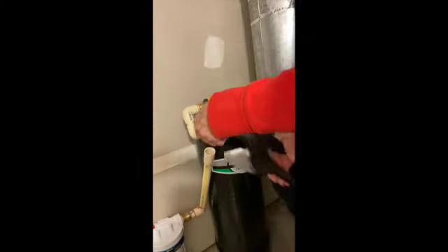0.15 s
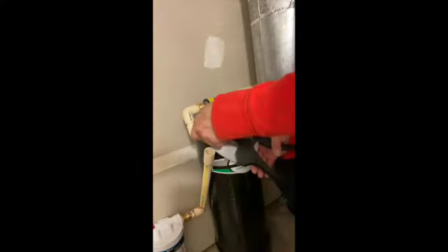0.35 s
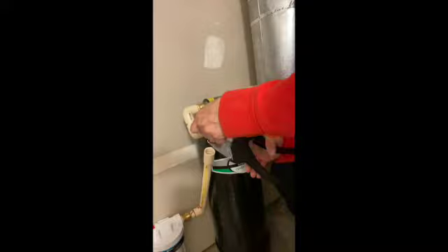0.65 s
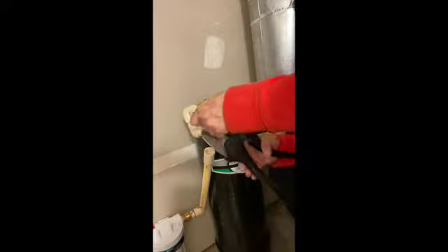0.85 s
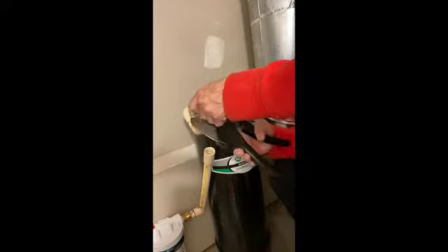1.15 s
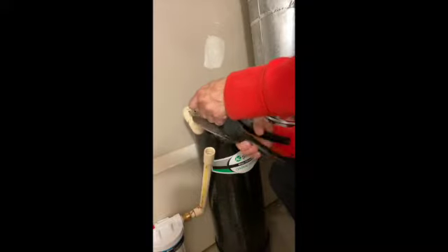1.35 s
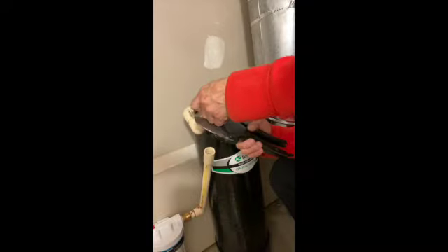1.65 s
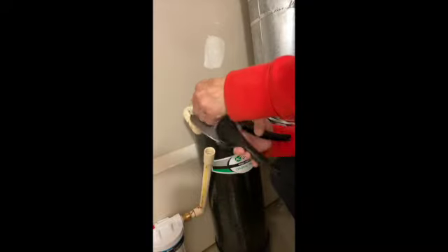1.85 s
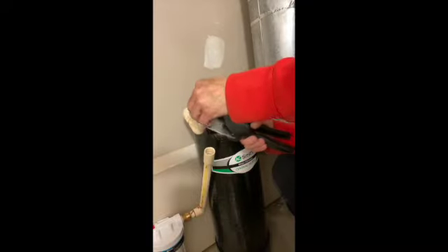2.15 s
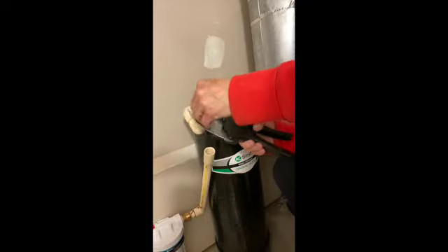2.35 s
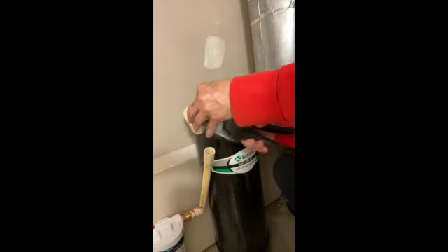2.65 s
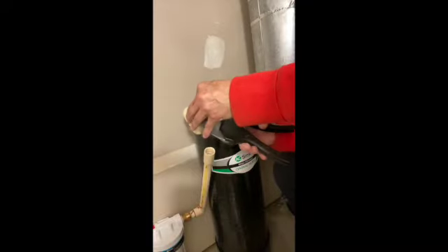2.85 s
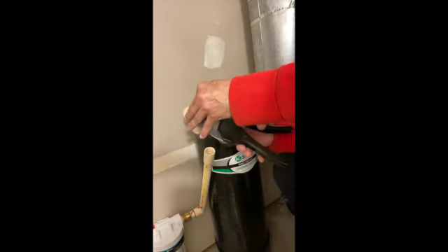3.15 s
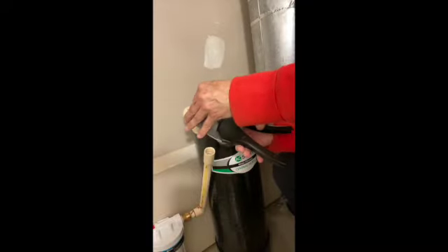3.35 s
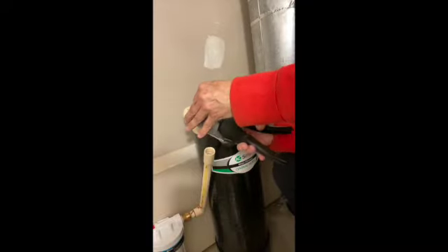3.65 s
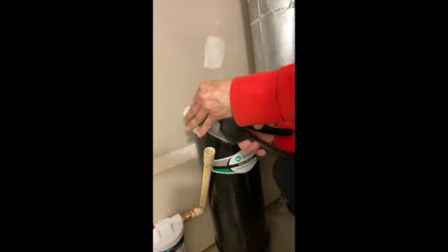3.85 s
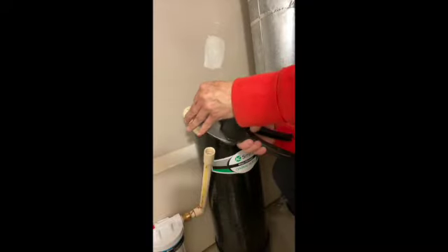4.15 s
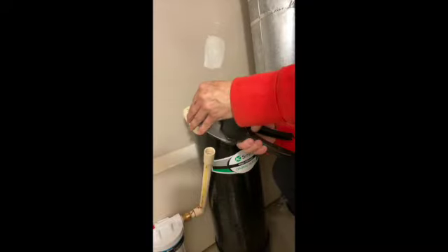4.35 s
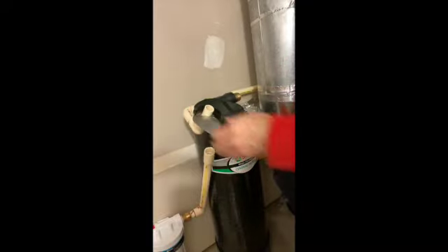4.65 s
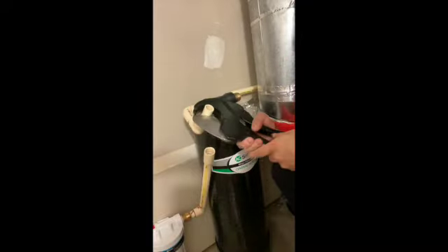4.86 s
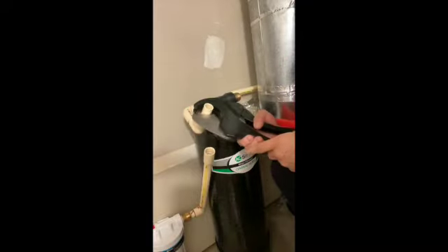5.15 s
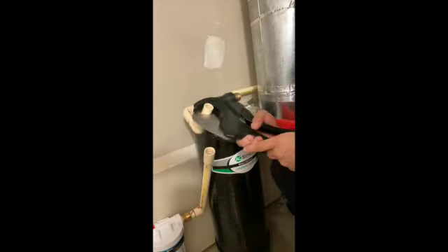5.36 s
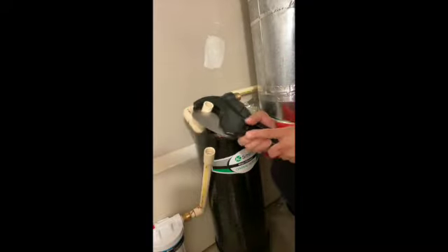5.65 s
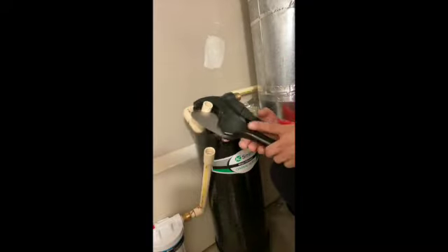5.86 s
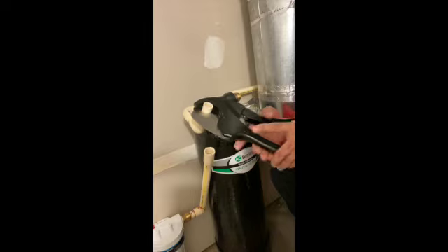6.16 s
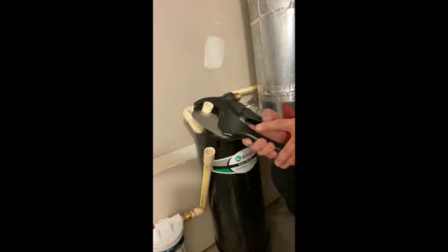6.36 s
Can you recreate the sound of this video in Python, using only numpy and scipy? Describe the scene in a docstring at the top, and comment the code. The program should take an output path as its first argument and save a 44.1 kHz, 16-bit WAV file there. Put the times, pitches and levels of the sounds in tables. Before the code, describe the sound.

Six hard ratchet clacks, four early and two late, among small plastic ticks, a short creak and sleeve rustle over quiet hum.

```python
"""Ratcheting cutter on a water pipe

A ratcheting cutter is squeezed through a plastic water pipe in a small utility corner.
Noise bursts shaped by jaw and pipe make the pawl snap and the handles tick; dying tones ring the steel.
Rows of slips creak the blade in the plastic; low tones boom and shudder the pipe; narrow noise scrapes.
Coloured noise in small catches is a sleeve, over a low mains hum of wavering tones and faint rumble."""
import sys
import numpy as np
from scipy import signal
from scipy.fft import rfft, irfft, next_fast_len
from scipy.io import wavfile
from scipy.ndimage import map_coordinates

SR = 44100
rng = np.random.default_rng(int(sys.argv[2]) if len(sys.argv) > 2 else 0)


def store_wav(level_fs):
    """Save 16-bit WAV to argv[1]."""
    pcm = np.round(np.clip(np.atleast_2d(level_fs), -1, 1) * 32767)
    wavfile.write(sys.argv[1], SR, pcm.T.astype(np.int16))


N = 286650  # length [samples]

# the knock, clack and crack of a contact, one row each: (from [Hz], to [Hz])
BANDS = [(150, 1200), (1200, 5500), (6000, 16000)]
# the pawl snaps: (time [s], clack [dB], crack [dB], hollowness [dB], bite pitch [Hz], bite [dB],
# thud before a shared 5.5 dB cut [dB], ring before each tone's own level [dB], favoured ring pitch [Hz])
SNAPS = [(1.5134, -26, -23, 4.5, 1704, -20.5, -51, -69, 1674),
         (1.7876, -16.5, -13.5, 1.5, 1568, -9.5, -41, -68, 1692),
         (2.1852, -25, -20, 6.5, 1673, -14.5, -40.5, -52, 2967),
         (2.707, -14.5, -14, -4, 2470, -22, -42, -54.5, 4300),
         (5.5376, -20, -17, -4.5, 3236, -25.5, -37, -63.5, 2210),
         (5.9507, -17, -14, -4.5, 2640, -27, -26, -71, 5146)]
# damped resonances of the pipe: (pitch [Hz], width [Hz], peak [dB])
PIPE_RESONANCES = [(299.8, 4.7, 18), (592.7, 90, 5), (870, 42, 8.8), (1590, 410, 6.5), (2300, 380, 5.8)]


def amp(db):
    """Turn decibels into a gain."""
    return 10 ** (np.asarray(db) / 20)


def unit(x):
    """Scale a sound to an rms of 1."""
    return x / np.sqrt(np.mean(x ** 2) + 1e-20)


def along(points, hz):
    """Read a curve of (Hz, value) points, joined by straight lines on a log frequency axis."""
    f, value = np.transpose(points)
    return np.interp(np.log(hz + 1), np.log(f + 1), value)


def wobble(rate):
    """Draw a smooth random curve through `rate` random points a second."""
    points = rng.standard_normal(int(N * rate / SR) + 4)
    return map_coordinates(points, [np.arange(N) * rate / SR])


def swell(middle, half):
    """Rise and fall smoothly about a moment, down to about a third of the peak at `half` seconds away."""
    t = np.arange(N) / SR
    return np.exp(-((t - middle) / half) ** 2)


def filtered(x, response):
    """Multiply the spectrum of a sound by a function of frequency."""
    size = next_fast_len(N + SR // 2)
    spectrum = rfft(x, size) * response(np.fft.rfftfreq(size, 1 / SR))
    return irfft(spectrum, size)[..., :N]


def pair(count, apart_db):
    """Noise at two close microphone ports: mostly shared, a little apart."""
    mid, side = rng.standard_normal((2, count))
    return mid + amp(apart_db) * np.array([side, -side])


def hiss(colour, apart_db):
    """Make steady coloured noise with an rms of 1."""
    return unit(filtered(pair(N, apart_db), lambda hz: amp(along(colour, hz))))


def add(track, s, sound):
    """Mix a sound into a track at time s."""
    part = track[:, max(round(s * SR), 0):][:, :sound.shape[-1]]
    part += sound[..., :part.shape[1]]


def body(colour, resonances, size=4096):
    """How an object answers a sharp tap: a smooth colour with resonant peaks, starting at once."""
    hz = np.fft.rfftfreq(size, 1 / SR)
    db = along(colour, hz)
    for pitch, width, peak_db in resonances:
        db = db + peak_db / (1 + (2 * (hz - pitch) / width) ** 2)
    # folding the cepstrum (the spectrum of the log spectrum) lets nothing sound before the tap
    cepstrum = irfft(np.log(amp(db)))
    cepstrum[1:size // 2] *= 2
    cepstrum[size // 2 + 1:] = 0
    return irfft(np.exp(rfft(cepstrum)))[None]


def burst(chatter_t60, walls_db, walls_t60, late_db, late_t60, grain_db):
    """A contact chatters in uneven grains; near walls answer, then the rest of the room."""
    t = np.arange(SR // 2) / SR
    # 900 random points a second make the grains
    unevenness = map_coordinates(rng.standard_normal(500), [t * 900], mode="wrap")
    grains = unit(amp(grain_db * unevenness))
    direct = amp(-60 * t / chatter_t60) * pair(len(t), apart_db=-17.5)
    walls = amp(walls_db - 60 * t / walls_t60)
    late = amp(late_db - 60 * t / late_t60)
    build_up = 1 - np.exp(-t / .002)
    return grains * direct + (walls + late) * build_up * pair(len(t), apart_db=-5)


def blow(push, response, levels_db):
    """A push through a body, its knock, clack and crack each at their own strength."""
    x = signal.fftconvolve(push, response, axes=1)
    onset = round(.014 * SR)  # each band's strength is set over its first 14 ms
    total = 0
    for band, db in zip(BANDS, levels_db):
        part = signal.sosfilt(signal.butter(3, band, "bandpass", fs=SR, output="sos"), x)
        total = total + amp(db) * part / np.std(part[:, :onset])
    return total


def mode(t, hz, t60, unrest):
    """A dying tone whose phase wanders a little, as hand-held parts do."""
    wander = unrest * np.cumsum(rng.standard_normal(len(t)))
    return amp(-60 * t / t60) * np.sin(2 * np.pi * hz * t + wander)


def room(air_db=-73, waver_db=1):
    """A slightly wavering mains hum over faint rumble."""
    # tones of the hum: (pitch [Hz], rms level [dB])
    hum_tones = [(120.3, -69), (82.6, -76), (240, -108), (324, -97)]
    # colour of the rumble: (frequency [Hz], level [dB])
    air_colour = [(25, -14.5), (48, -3.5), (90, -7.5), (130, -10.5), (190, -22), (350, -25.5), (600, -36),
                  (2000, -39.5), (4700, -43), (8000, -42), (13600, -49), (16000, -65)]
    t = np.arange(N) / SR
    hum = 0
    for hz, db in hum_tones:
        level = amp(db + waver_db * wobble(0.66)) * np.sqrt(2)
        hum = hum + level * np.sin(2 * np.pi * hz * t + 0.25 * wobble(1.0))
    return hum + amp(air_db) * hiss(air_colour, apart_db=-9.5)


def sleeve(body_db=-1, fizz_db=-1, grain_db=2):
    """Cloth and skin rub in small uneven catches, with each arm move and each squeeze of the handles."""
    # the arm moves and the sleeve rubs: (middle [s], half length [s],
    # level before the shared body and fizz levels [dB], fizz over body before those too [dB])
    strokes = [(0.02, 0.091, -79, -3.5), (0.98, 0.046, -73.5, -7), (2.12, 0.17, -62.5, -12.5),
               (2.44, 0.037, -69.5, -1), (2.58, 0.047, -59, -10.5), (3.45, 0.15, -81, -13),
               (3.85, 0.076, -67, -8.5), (4.49, 0.17, -80, -1), (4.9, .14, -69, -3.5),
               (5.78, 0.047, -61.5, -0.5), (6.14, .11, -62, -6.5)]
    # colours of the body of the rub and of its fizz: (frequency [Hz], level [dB])
    rub_colour = [(150, -21.5), (300, -7), (800, -7.5), (1150, -14.5), (1420, -7), (1750, -7.5),
                  (3800, -8.5), (5500, -16.5), (7000, -48.5)]
    fizz_colour = [(3000, -24), (5500, -9), (7500, 0), (10000, 0), (13700, -2), (15000, -26)]
    # the grip rubs around each snap, this far under its crack
    squeeze_db, squeeze_fizz_db, squeeze_half_s, squeeze_lag_s = -49, -6, .13, 0.0074
    rest_db, rest_fizz_db = -88, -5.5  # cloth that never quite keeps still

    rubs = list(strokes)
    for s, _, crack_db, *_ in SNAPS:
        rubs.append((s + squeeze_lag_s, squeeze_half_s, crack_db + squeeze_db, squeeze_fizz_db))
    low, high = amp(rest_db), amp(rest_db + rest_fizz_db)
    for middle, half, db, bright_db in rubs:
        rub = amp(db) * swell(middle, half)
        low = np.hypot(low, rub)
        high = np.hypot(high, amp(bright_db) * rub)
    catches = unit(amp(grain_db * (wobble(70) + wobble(250))))
    rustle = amp(body_db) * low * hiss(rub_colour, apart_db=-2.5)
    fizz = amp(fizz_db) * high * hiss(fizz_colour, apart_db=-16)
    return catches * (rustle + fizz)


def bending(hz, lag_s=0.0027, prompt_hz=2500):
    """Bending waves slow down as they get lower, so each knock arrives as a quick falling sweep."""
    floored_hz = np.maximum(hz, BANDS[0][0])  # below the knock band the delay stays the same
    delay = lag_s * np.maximum(np.sqrt(prompt_hz / floored_hz) - 1, 0)
    step_hz = hz[1]
    return np.exp(-2j * np.pi * np.cumsum(delay) * step_hz)


def handling(bite_db=9, bite_width_hz=240, rebound_s=.013, rebound_db=-14):
    """Soft contacts press into the pipe and settle with a weaker second touch; low ones knock more."""
    # light contacts of jaw, handles and pipe:
    # (time [s], clack [dB], hardness as crack over clack [dB], bite pitch [Hz])
    ticks = [(0.366, -41.5, -15, 1800), (0.716, -55, -13.5, 765), (0.919, -68, -13, 560),
             (1.413, -63.5, -8, 3200), (1.658, -56, -10, 2530), (1.721, -37.5, -14.5, 2960),
             (1.766, -48, -11, 3000), (1.981, -58, -12.5, 623), (2.028, -48.5, -20, 2535),
             (2.067, -50, -16, 2500), (2.098, -50.5, -13.5, 3100), (2.14, -45, -8.5, 3230),
             (2.379, -62.5, -17.5, 590), (2.462, -54.5, -20, 2850), (2.553, -49, -13, 2310),
             (2.601, -54.5, -37, 2420), (2.626, -54, -37, 2560), (2.688, -45, -21.5, 2530),
             (3.541, -67, -29, 1500), (3.569, -61.5, -32, 2870), (3.781, -53, -25.5, 2277),
             (3.871, -52, -22, 1900), (3.948, -45, -20.5, 2460), (4.412, -74, 6.5, 2425),
             (5.223, -66, -22, 2270), (5.322, -54.5, -15.5, 2350), (5.586, -43.5, -1, 1520),
             (5.852, -63.5, -3.5, 831), (5.93, -42, -17.5, 2700), (6.207, -45, -29, 2100)]
    # colour of a light contact: (frequency [Hz], level [dB])
    tick_colour = [(120, -10.5), (300, -5), (600, -3.5), (1200, -4), (3000, 1), (4500, -4.5), (6000, -6.5),
                   (9000, -9.5), (13500, -14.5), (15000, -34)]
    # a contact pitched here knocks as loud as it clacks; higher ones knock less
    knock_even_hz, knock_db_per_octave = 762.6, -6.5
    press_s = 0.002  # how long a light contact takes to build up in the plastic

    out, t = np.zeros((2, N)), np.arange(SR // 2) / SR
    press = 1 - np.exp(-t / press_s)
    for s, db, hardness_db, bite_hz in ticks:
        knock_db = db + knock_db_per_octave * np.log2(bite_hz / knock_even_hz)
        levels = np.array([knock_db, db, db + hardness_db])
        pipe = body(tick_colour, PIPE_RESONANCES + [(bite_hz, bite_width_hz, bite_db)])
        second_touch = rebound_s * rng.uniform(0.76, 1.3)
        for delay, loss_db in [(0, 0), (second_touch, rebound_db)]:
            push = burst(chatter_t60=.042, walls_db=-10, walls_t60=.1, late_db=-36, late_t60=.33, grain_db=5)
            add(out, s + delay, blow(push * press, pipe, levels + loss_db))
    return filtered(out, bending)


def pipework(jolt_db=-9):
    """The plumbing booms when bumped, stirs faintly with each snap's crack and shudders when squeezed."""
    # low tones of the pipework: (pitch [Hz], level when bumped [dB], time to fade by 60 dB [s])
    boom_tones = [(49.52, -39.5, 0.72), (86, -22.5, 0.073), (159, -40.5, 0.24), (189.4, -50, 0.24)]
    # the loose pipe shudders: (middle [s], half length [s], pitch [Hz], level [dB])
    shudders = [(2.11, 0.061, 96.4, -54.5), (3.333, 0.031, 122.4, -47.5), (4.003, .022, 100.5, -45.5),
                (5.373, 0.03, 96.9, -45), (5.601, 0.025, 105.5, -49), (6.266, .04, 84.2, -57.5)]
    bump_s = .378  # the jaw lands on the pipe

    out, t = np.zeros((2, N)), np.arange(N) / SR
    boom = sum(amp(db - 60 * t / t60) * np.sin(2 * np.pi * hz * t) for hz, db, t60 in boom_tones)
    boom = boom * (1 - np.exp(-t / 0.018))  # soft start
    add(out, bump_s, boom)
    for s, _, crack_db, *_ in SNAPS:
        add(out, s, amp(crack_db + jolt_db) * boom)
    for middle, half, hz, db in shudders:
        out += amp(db) * swell(middle, half) * np.sin(2 * np.pi * hz * (t - middle))
    return out


def scrapes():
    """Sliding contacts draw faint, narrow tones from the pipe and the steel."""
    # steel and hand slide on the pipe:
    # (middle [s], half length [s], pitch [Hz], width before division by 0.9 [Hz], level [dB])
    slides = [(0.737, 0.024, 3370, 80, -68.5), (0.93, 0.12, 1790, 35, -82), (1.14, 0.021, 3370, 80, -82),
              (4.83, 0.18, 1385, 220, -71), (5.283, 0.13, 2093, 220, -75)]
    out = np.zeros((2, N))
    for middle, half, hz, width_hz, db in slides:
        narrow = lambda f: 1 / (1 + ((f - hz) / width_hz * 0.9) ** 2)
        tone = unit(filtered(pair(N, apart_db=-4), narrow))
        out += amp(db) * swell(middle, half) * tone
    return out


def ratchet(bite_t60=0.033, favour_db=14, thud_hz=65, sweep_hz=420):
    """Each snap of the pawl cracks through the jaw, jolts the pipe and leaves the steel ringing."""
    # ringing steel of the cutter, before the hand deadens it:
    # (pitch [Hz], level over the snap's ring [dB], time to fade by 60 dB [s])
    steel_tones = [(1720, -3, 0.58), (2100, -8.5, 0.94), (2260, -7, 0.24), (2896, -4, 0.59),
                   (4025, -12.5, 0.82), (4550, -5.5, 0.36), (5195, -1, 0.89), (6000, 3, 1), (5988, 1, 0.4),
                   (8940, -10, 0.98), (9100, -9.5, 0.3), (9520, -7, 0.73), (10300, -6, 0.28),
                   (9900, -6.5, 0.35)]
    # damped resonances of the jaw: (pitch [Hz], width [Hz], peak [dB])
    jaw_resonances = [(1580, 130, 8), (1720, 70, 4), (2170, 70, 4), (2400, 110, 5), (2520, 90, 4),
                      (2860, 110, 6), (3074, 70, 5), (3655, 100, 5), (3880, 110, 4), (7190, 70, 6),
                      (8720, 120, 3), (10190, 90, 5), (10600, 250, 3), (11075, 80, 3), (11600, 110, 5)]
    # colour of a snap: (frequency [Hz], level [dB])
    snap_colour = [(100, -30.5), (400, -19), (1000, -18.5), (1500, -7.5), (2500, -2), (4500, -2),
                   (6000, -5.5), (8000, -11.5), (11000, -6.5), (13000, -5.5), (14300, -8), (15300, -29.5),
                   (17000, -43.5)]
    hollow_hz, hollow_width_hz = 1787, 1300  # the broad resonance of the hand cupped round the jaw
    knock_db = -23  # the knock of a snap, against its clack
    # a much fainter burst 8 ms ahead of each snap: its knock, clack and crack against the snap's
    lead_s, lead_db = .008, (-25.5, -19.5, -39.5)

    out, t = np.zeros((2, N)), np.arange(SR // 2) / SR
    # bending waves run faster when higher, so the jolt arrives as a falling sweep
    pitch = thud_hz + sweep_hz * np.exp(-t / 0.0039)
    thud = np.sin(2 * np.pi * np.cumsum(pitch) / SR) * (t / .005) * np.exp(1 - t / .005)
    # the tightening hand deadens the steel
    grip = np.exp(-(t / .27) ** 4)
    for s, clack_db, crack_db, hollow_db, bite_hz, bite_db, thud_db, ring_db, ring_hz in SNAPS:
        hollow = (hollow_hz, hollow_width_hz, hollow_db)
        jaw = body(snap_colour, jaw_resonances + PIPE_RESONANCES[:1] + [hollow])
        levels = np.array([clack_db + knock_db, clack_db, crack_db])
        for start, strength in [(s - lead_s, levels + lead_db), (s, levels)]:
            push = burst(chatter_t60=.045, walls_db=-9, walls_t60=.11, late_db=-44, late_t60=.3, grain_db=3)
            add(out, start, blow(push, jaw, strength))
        # one heavily damped resonance of the loaded jaw gives each snap its pitch
        bite = (1 - np.exp(-t / 0.0017)) * mode(t, bite_hz, bite_t60, unrest=0.046)
        add(out, s, amp(bite_db) * bite)
        add(out, s + 0.0014, amp(thud_db - 5.5) * thud)
        for hz, db, t60 in steel_tones:
            # where the pawl lands decides which modes take most of the blow
            near = np.exp(-(np.log(hz / ring_hz) / 0.14) ** 2)
            level_db = ring_db + db + favour_db * near + rng.normal(0, 1.0)
            add(out, s, amp(level_db) * grip * mode(t, hz, t60, unrest=.022))
    return out


def creaks(jitter=0.16, ring_db=-4, ring_hz=2890):
    """Uneven slips swell and fade as the blade turns in the cut; each one rings the blade briefly."""
    # the blade sticks and slips in the plastic:
    # (middle [s], half length [s], level before a shared 21 dB cut [dB], slip rate [per s])
    creak_rows = [(3.069, 0.011, -55.5, 142), (3.088, 0.0085, -47.5, 185), (3.102, 0.00394, -47, 196),
                  (3.264, 0.0112, -40.5, 110), (3.307, 0.034, -28, 124.5)]
    # colour of a slip: (frequency [Hz], level [dB])
    creak_colour = [(100, -20.5), (300, -11), (700, -3), (1500, -3.5), (3200, 1.5), (4500, -1), (7000, -3),
                    (10000, -12.5), (13500, -10.5), (15000, -41.5)]
    # damped resonances of the blade: (pitch [Hz], width [Hz], peak [dB])
    blade_resonances = [(298, 13, 15), (1560, 230, 8.6), (2823, 242, 15), (3250, 260, 6)]

    out, t = np.zeros((2, N)), np.arange(SR // 2) / SR
    blade = body(creak_colour, blade_resonances)
    ring = unit(np.sin(2 * np.pi * ring_hz * t) * amp(-60 * t / .028))
    steps = np.arange(-10, 11)
    for middle, half, db, rate in creak_rows:
        offsets = (steps + jitter * rng.standard_normal(len(steps))) / rate
        for offset in offsets[np.abs(offsets) < 2 * half]:
            push = burst(chatter_t60=.017, walls_db=-12, walls_t60=.1, late_db=-36, late_t60=.3, grain_db=1)
            scratch = unit(signal.fftconvolve(push, blade, axes=1))[:, :len(t)]
            slip = scratch + amp(ring_db) * ring
            add(out, middle + offset, amp(db - 21) * np.exp(-(offset / half) ** 2) * slip)
    return out


def scene():
    """The near sounds reach the right microphone port a fraction of a millisecond before the left."""
    # between the ports: (frequency [Hz], phase by which left leads [rad], left minus right [dB])
    ports = [(20, 0, .5), (300, -.2, .3), (700, -.4, .6), (1500, -.75, .4), (2500, -1, 2.2),
             (4000, -1.6, .6), (5000, -2.8, .4), (7000, -4.6, 0), (9000, -5.9, -.3), (12000, -7.2, 0),
             (14600, -9.2, .3), (17000, -10, .3)]
    near = sleeve() + handling() + pipework() + scrapes() + ratchet() + creaks()
    f, phase, balance_db = np.transpose(ports)
    sides = np.array([[.5], [-.5]])  # each port takes half of the difference

    def port_response(hz):
        """Level and phase at the left and right port."""
        gain = amp(sides * np.interp(hz, f, balance_db))
        return gain * np.exp(1j * sides * np.interp(hz, f, phase))

    return filtered(near, port_response) + room()


def record(dry, notch_hz=5850, notch_width_hz=600, notch_db=-17, top_hz=16900):
    """The microphone has a hollow in the treble, rounds the highest peaks and has a steep band limit."""
    x = filtered(dry, lambda hz: amp(notch_db * np.exp(-((hz - notch_hz) / notch_width_hz) ** 2)))
    x = x / (1 + (x / .9) ** 6) ** (1 / 6)
    # fades out over the last 500 Hz below the top
    return filtered(x, lambda hz: np.clip((top_hz - hz) / 500, 0, 1))


dry = scene()
out = record(dry)
store_wav(out)
```